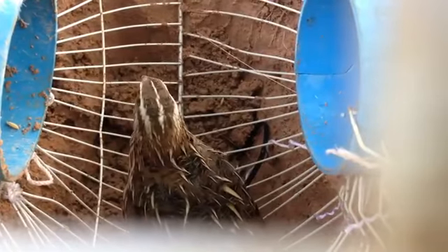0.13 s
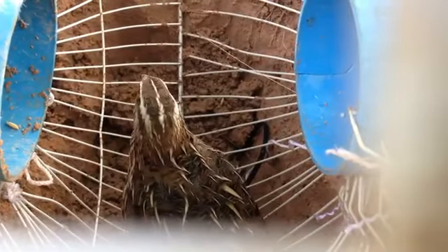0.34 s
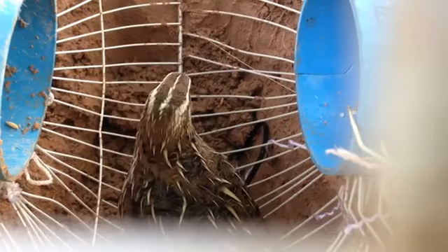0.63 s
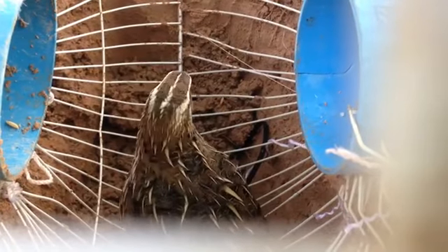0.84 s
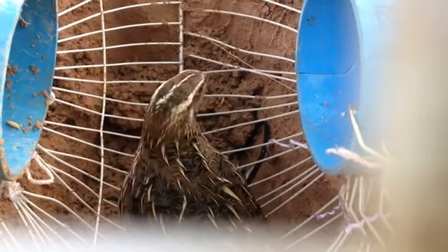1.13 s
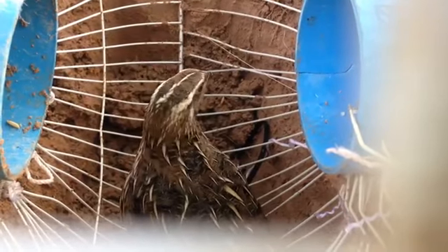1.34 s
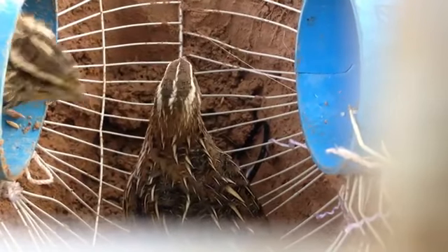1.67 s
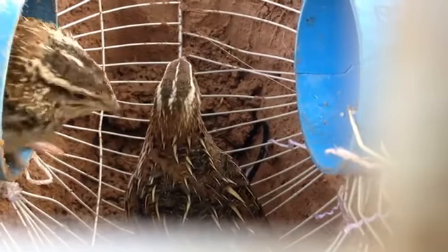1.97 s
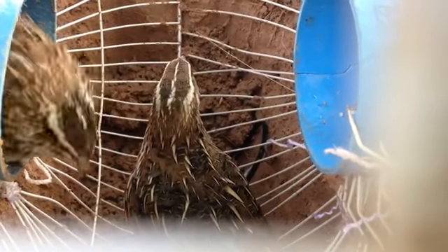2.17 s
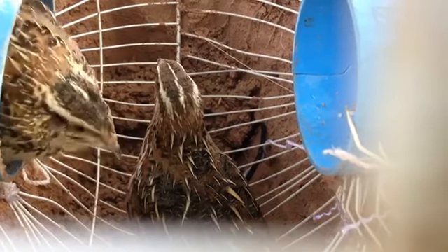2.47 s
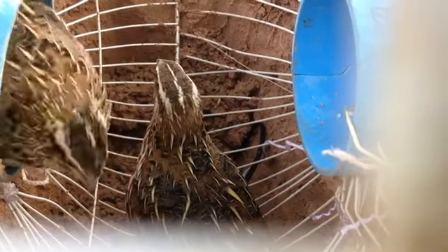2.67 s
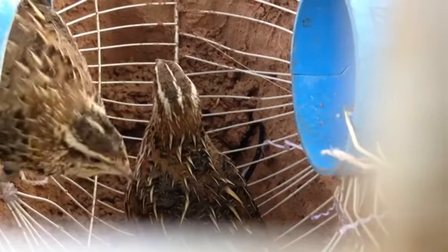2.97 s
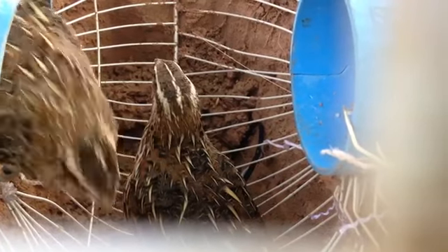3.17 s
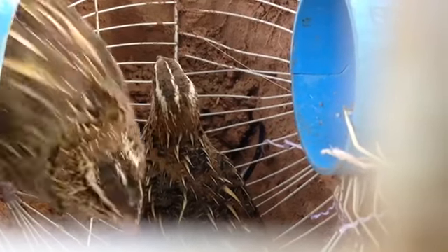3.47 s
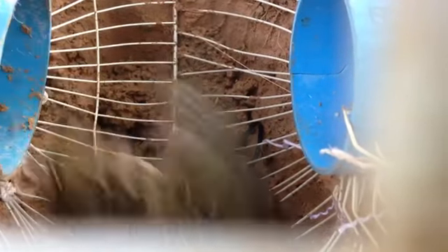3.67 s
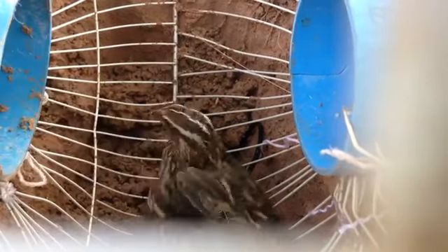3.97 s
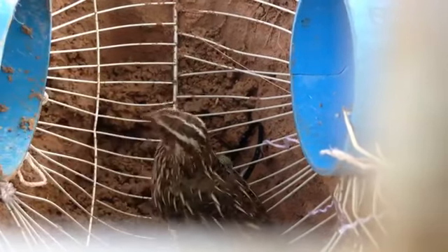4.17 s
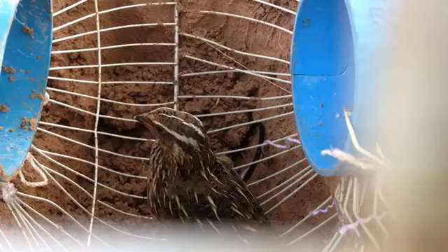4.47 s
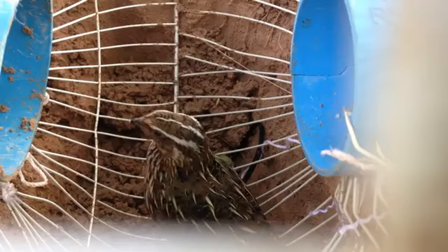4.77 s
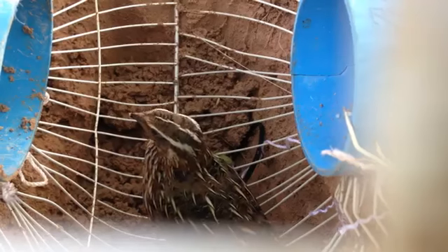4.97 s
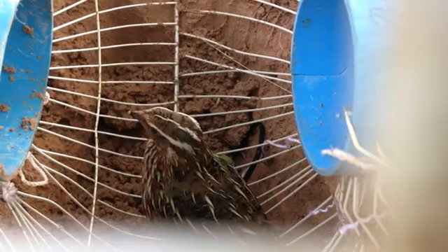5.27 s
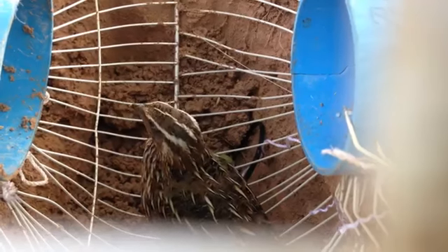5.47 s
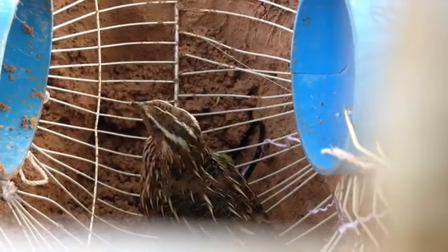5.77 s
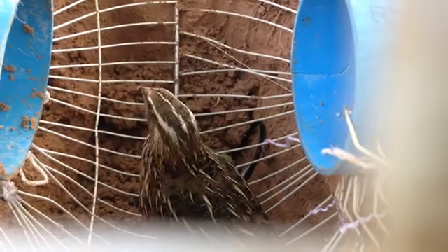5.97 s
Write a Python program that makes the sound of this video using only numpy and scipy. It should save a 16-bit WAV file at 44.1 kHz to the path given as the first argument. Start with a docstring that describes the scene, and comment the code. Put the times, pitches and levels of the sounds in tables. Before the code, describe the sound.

One quail gives four pairs of throbbing, rising two-note chirps amid wire ticks, then a sudden fluttering scramble rattles the cage and quiet ticking follows.

```python
"""A small wire cage on hollow ground outdoors, with quail in it.
One bird gives four pairs of throbbing two-note chirps: a whistle that leaps in pitch and dips in level.
Others add gliding peeps, a coo and faint hoots, all whistles that follow pitch tables.
Feet and beaks tick and ring the wire as fading tones, and a bird flutters off in bursts of noise and knocks.
The ground booms softly in fading low tones, over shaped noise: rumble, hiss, far chatter and a sizzle."""
import sys
import numpy as np
from scipy import signal
from scipy.fft import rfft, irfft, next_fast_len
from scipy.io import wavfile
from scipy.ndimage import uniform_filter1d, map_coordinates

SR = 44100
rng = np.random.default_rng(int(sys.argv[2]) if len(sys.argv) > 2 else 0)


def log_audio(samples):
    """Write samples as a 16-bit WAV file to the path given in sys.argv[1]."""
    # one column per channel
    frames = np.atleast_2d(samples).T
    # limit to full scale, then quantise
    limited = np.clip(frames, -1, 1)
    pcm = np.round(limited * 32767).astype(np.int16)
    wavfile.write(sys.argv[1], SR, pcm)


N = 269451

# Outdoor rumble, its tone colour: (frequency [Hz], relative level per Hz [dB])
RUMBLE_COLOUR = [(12, -51), (20, -27), (59, 0.5), (140, 0.5), (273, -10), (325, -17), (426, -19.5),
                 (507, -22), (567, -28), (644, -21.5), (900, -36.5), (1170, -48.5), (1980, -120)]
# Loudness of the rumble: (time [s], level [dB])
RUMBLE_LEVEL = [(0, -58), (.3, -58), (1.1, -58), (1.5, -60), (1.9, -58.5), (2.6, -57), (3.3, -58),
                (3.85, -54.5), (4.0, -57.5), (4.3, -57.5), (5.0, -57.5), (5.8, -57), (6.11, -55.5)]
# Microphone hiss, its tone colour: (frequency [Hz], relative level per Hz [dB])
HISS_COLOUR = [(290, -23.5), (500, -4), (561, -4.5), (648, -8), (1530, -10), (1670, -10), (3480, -8.5),
               (4440, -8), (14000, -11.5), (15500, -14)]
# Loudness of the hiss: (time [s], level [dB])
HISS_LEVEL = [(0, -64), (1.5, -65), (2.6, -63.5), (3.3, -64.5), (4.0, -63), (4.9, -64.5), (5.36, -62.5),
              (5.7, -64), (6.11, -63)]
# Far bird chatter, its tone colour: (frequency [Hz], relative level [dB])
CHATTER_COLOUR = [(900, -32.5), (1300, -5.5), (1700, 0.5), (2300, -7), (3400, -4.5), (4200, -5),
                  (6000, -43)]
# Swells of the far chatter: (loudest time [s], rise [ms], fall [ms], level [dB])
CHATTER_SWELLS = [(.2, 130, 180, -74), (2.55, 1100, 340, -78), (4.5, 520, 250, -74), (5.38, 180, 210, -69),
                  (6.1, 190, 100, -73)]
# A high hiss that swells twice: (loudest time [s], rise [ms], fall [ms], level [dB])
SIZZLE_SWELLS = [(5.39, 25, 94, -65), (6.02, 110, 59, -61)]
# Tone colour of that high hiss: (frequency [Hz], relative level per Hz [dB])
SIZZLE_COLOUR = [(5000, -13), (8200, -5.5), (9400, -11), (11500, -1.5), (13000, -12), (15500, -11)]
# Soft booms of the ground: (time [s], level [dB], pitch [Hz])
BOOMS = [(.333, -46, 111), (1.943, -42.5, 131), (2.021, -43, 118), (2.736, -39, 129), (2.815, -41, 128),
         (2.998, -46.5, 114.5), (3.482, -38, 132), (3.519, -42, 98), (3.787, -42, 176), (4.016, -40, 133),
         (4.078, -43, 127), (4.15, -43, 120), (6.037, -40, 118.5), (6.078, -47, 176.4)]
# Feathers brushing the wire: (loudest time [s], rise [ms], fall [ms], tips level [dB], wing level [dB])
RUSTLES = [(1.952, 15, 13, -57.5, -70), (2.172, 65, 8.7, -59.5, -72), (3.577, 15, 25, -62, -62),
           (3.818, 29, 9.1, -61, -57.5), (3.879, 33, 14.7, -50, -50.5), (3.93, 4.2, 10, -55, -55),
           (4.02, 36, 14.4, -57.5, -54.5), (5.026, 7.4, 41, -64, -61), (5.178, 14, 10, -60, -61),
           (5.85, 8, 14, -66, -67)]
# Feather tips, also the colour of the patter: (frequency [Hz], relative level per Hz [dB])
TIPS_COLOUR = [(1470, -20), (2500, -6.5), (6980, -9), (7810, -10), (13700, -12.5), (15000, -11.5)]
# Wing strokes: (frequency [Hz], relative level per Hz [dB])
WINGS_COLOUR = [(150, -33), (250, 4), (551, -6), (785, -10.5), (997, -7.5), (1480, -4), (3000, -19),
                (3900, -37), (6600, -120)]
# Contacts with the cage: (time [s], tick level [dB], touched wire level [dB], touched wire pitch [Hz],
# knock level [dB], thud level [dB])
CONTACTS = [(.071, -49, -50, 2020, -64, -70), (0.0901, -50, -48, 2060, -56, -54),
            (0.186, -43, -50, 1700, -79, -69), (0.227, -50, -65, 2360, -80, -73),
            (0.3324, -43.5, -58, 2280, -61, -62), (0.3376, -48, -43.5, 2070, -58, -52),
            (0.6972, -46, -30.5, 2140, -56, -45.5), (0.7062, -50, -51, 1720, -60, -52),
            (0.7576, -47, -56, 2180, -73, -60), (0.9371, -45.5, -32.5, 2180, -51, -49),
            (1.1784, -51, -51.5, 2020, -64, -62), (1.283, -48, -39, 1980, -60, -51.5),
            (1.292, -40.5, -57, 1950, -57, -69), (1.297, -45, -49, 1470, -67, -65),
            (1.73, -49, -50.5, 2050, -72, -58), (2.1681, -47.5, -48, 2500, -66, -68),
            (2.532, -53, -67, 1700, -63, -59), (2.628, -42.5, -42.5, 1550, -54.5, -57),
            (2.6877, -47.5, -43.5, 2580, -69, -66), (2.845, -49.5, -49.5, 1980, -61, -50.5),
            (2.9069, -57, -50, 1590, -62, -56), (3.5748, -49, -58, 1590, -57, -56),
            (3.7918, -51, -43.5, 2020, -58, -44), (3.8327, -42.5, -20, 1540, -26.5, -28.5),
            (3.8354, -54, -28.5, 1960, -25.5, -58), (3.8522, -52, -50, 1990, -39.5, -56),
            (3.8573, -59, -41, 1690, -47, -53), (3.8774, -53, -44, 1420, -46, -36),
            (3.9098, -48, -50, 1400, -67, -53), (3.9287, -42.5, -31.5, 1910, -39.5, -28.5),
            (3.9461, -49, -46, 1470, -51, -62), (4.0004, -57, -54, 1510, -46.5, -64),
            (4.044, -51.5, -50, 1440, -53.5, -71), (4.32, -54.5, -52, 1500, -62, -63),
            (4.462, -53, -70, 1630, -74, -66), (5.0261, -46.5, -40.5, 1700, -54.5, -49.5),
            (5.093, -49, -61, 2280, -71, -63), (5.1749, -45.5, -45.5, 2100, -63, -64),
            (5.1864, -54, -47, 1590, -59, -71)]
# Ringing tones of the neighbouring wires: (pitch [Hz], typical level [dB], time to fall 60 dB [s])
WIRE_TONES = [(1422, -6, 0.019), (1747, 0.5, 0.029), (1840, -11, 0.042), (2770, -7, 0.033),
              (3070, -10, 0.013)]
# Ringing tones of the cage frame: (pitch [Hz], typical level [dB], time to fall 60 dB [s])
FRAME_TONES = [(544, -1, 0.039), (654, 2.5, 0.024), (750, -6.5, .03), (1142, 0.5, 0.018)]
# Ringing tones of the cage floor: (pitch [Hz], typical level [dB], time to fall 60 dB [s])
FLOOR_TONES = [(220, -11, 0.032), (296, 1.5, 0.039), (392, -1.5, 0.021)]
# Main noise of a tick: (frequency [Hz], relative level [dB])
TICK_COLOUR = [(1500, -37), (3000, -1.5), (5000, -1), (6500, -8.5), (8000, -20.5)]
# Bright edge of a tick: (frequency [Hz], relative level [dB])
BRIGHT_COLOUR = [(5000, -36), (7000, -3.5), (12000, -6), (16000, -13)]
# The contacts carry no deep bass: (frequency [Hz], gain [dB])
CONTACT_BASS_CUT = [(50, -30), (170, 0), (16000, 0)]
# Thin peeps, one list each: (time [s], pitch [Hz], level [dB])
PEEPS = [
    [(0.122, 3570, -68), (0.14, 4570, -68), (0.167, 5290, -58), (0.175, 3340, -59), (0.181, 2140, -58),
     (0.19, 1666, -66), (0.212, 1730, -65)],
    [(1.414, 1515, -72), (1.425, 980, -69), (1.445, 1540, -76), (1.47, 1700, -74)],
    [(1.94, 1560, -67), (1.955, 1450, -63.5), (1.97, 1477, -66), (1.98, 2110, -64)],
    [(4.589, 1337, -60), (4.605, 1865, -47), (4.622, 1384, -53), (4.627, 2570, -46.5), (4.633, 4250, -58),
     (4.64, 2680, -54)],
    [(5.45, 1455, -61), (5.46, 1604, -55), (5.472, 1437, -53), (5.478, 1690, -50), (5.483, 2939, -75)],
    [(5.535, 3800, -68), (5.565, 3270, -56), (5.58, 2960, -60), (5.598, 2850, -61)],
]
# The coo: (time [s], base pitch [Hz], level [dB])
COO = [(2.535, 213, -73), (2.555, 218.4, -63), (2.59, 239.7, -59.5), (2.62, 235.7, -59.5),
       (2.648, 255, -60.5), (2.67, 220, -61)]
# Tones heard in the coo: (multiple of the base pitch [times], relative level [dB])
COO_TONES = [(3, -4.5), (4, 3.5), (7, -11), (8, -13)]
# Faint low hoots: (loudest time [s], pitch before a 1 % lowering [Hz], level [dB], half length [ms])
HOOTS = [(.18, 330, -58, 22), (.41, 332, -59, 15)]
# Arched peeps: (start [s], top [s], tail reached [s], end [s], top pitch [Hz], tail pitch [Hz], level [dB],
# fade of the tail [dB], lift near the tube's resonance [dB], overtone level [dB])
ARCHES = [(1.309, 1.347, 1.387, 1.416, 3140, 1830, -46.5, -7, 12, -18),
          (2.676, 2.714, 2.749, 2.787, 3470, 1860, -49, -3, 1, -32),
          (5.99, 6.034, 6.071, 6.1, 3330, 1900, -49.5, -6, 11, -32)]
# Shape of every arch: (stage: 0 start, 1 top, 2 tail, 3 end [number],
# way from tail pitch to top pitch [share], relative level [dB])
ARCH_SHAPE = [(0, .05, -16), (.3, .45, -2), (.63, .8, -3), (1, 1, -1.5), (1.35, .85, -2.5), (1.7, .35, 0),
              (2, .04, -.5), (2.5, 0, 0), (3, .05, -4)]
# Chirps, first and second of each pair in turn; the voice catches, then leaps from the low to the high note:
# (start [s], catch [s], low note [Hz], high note [Hz])
CHIRPS = [(0.256, .279, 2330, 2582), (.388, 0.409, 2445, 2672), (0.86, .878, 2320, 2618),
          (.986, 1.0057, 2468, 2733), (1.495, 1.515, 2370, 2630), (1.620, 1.649, 2486, 2778),
          (2.119, 2.142, 2405, 2635), (2.244, 2.272, 2487, 2777)]
# Pitch of the low note, in a first and in a second chirp: (time after the start [ms], above the low note [Hz])
LOW_NOTE = [
    [(-6, -39.5), (1.5, 40), (9, 0), (15, 10)],
    [(-5.5, 190), (-1, 158), (1.5, 49.5), (10, -10), (16.5, 20)],
]
# Pitch of the high note, in a first and in a second chirp: (time after the catch [ms], above the high note [Hz])
HIGH_NOTE = [
    [(3, -140), (11, -30.5), (22, 19), (32, 2), (40, -51.5)],
    [(3, -50.5), (10, -30.5), (18, -0.5), (26, 16), (38, -8.5), (48, -120)],
]
# Loudness of each chirp, one list each: (time [s], level [dB])
LOUDNESS = [
    [(.248, -64), (.259, -41.5), (.272, -37), (.284, -35), (.300, -35), (.315, -28), (.3195, -46),
     (.325, -56)],
    [(.376, -65), (.385, -46), (.390, -30), (.402, -27), (.411, -35), (.418, -32), (.423, -43),
     (.434, -26.5), (.445, -42), (.451, -36), (.457, -67)],
    [(.858, -60), (.864, -42), (.871, -40), (.877, -33.5), (.890, -32), (.902, -37), (.915, -27),
     (.9205, -50), (.927, -56)],
    [(.976, -52), (.983, -38), (.990, -27), (1.002, -30), (1.014, -26.5), (1.025, -25), (1.034, -27.5),
     (1.045, -26.5), (1.053, -41), (1.06, -55)],
    [(1.484, -60), (1.498, -41), (1.510, -38.5), (1.520, -40.5), (1.529, -24.5), (1.540, -27.5),
     (1.544, -28), (1.548, -22), (1.556, -29.5), (1.562, -55)],
    [(1.617, -70), (1.630, -27), (1.644, -26), (1.656, -23.5), (1.660, -24), (1.665, -21.5), (1.673, -34),
     (1.682, -22), (1.693, -27.5), (1.699, -53)],
    [(2.106, -69), (2.114, -48.5), (2.128, -48), (2.134, -36), (2.150, -31.5), (2.157, -32.5), (2.165, -60),
     (2.169, -35), (2.181, -25.5), (2.186, -52)],
    [(2.239, -63), (2.246, -32), (2.254, -19), (2.260, -22.5), (2.268, -26), (2.277, -18.5), (2.283, -22),
     (2.287, -20.5), (2.305, -20), (2.317, -33), (2.322, -49)],
]
# Moments where a chirp dips and its wave turns over: (time [s], width to one side [ms])
DIPS = [(.265, 2.2), (.295, 2.4), (.388, 1.2), (.396, 1.7), (0.897, 2.5), (.986, 1.1), (.995, 1.2),
        (1.021, 2.5), (1.522, 1.2), (1.533, 2.6), (1.635, 3.6), (2.120, 1.5), (2.159, 1.9)]
# Soft pips just before or after a chirp: (loudest time [s], pitch [Hz], level [dB])
PIPS = [(.375, 1830, -58), (.854, 2300, -51), (1.089, 1800, -61), (1.486, 2160, -55), (1.616, 1840, -57),
        (2.192, 2420, -48), (2.237, 1860, -54), (2.357, 1880, -58)]

TOP_HZ = 15150  # nothing is kept from here up
BOOM_T60_S = 0.18  # time to fall 60 dB
PATTER_PER_S, PATTER_DB, PATTER_SPREAD_DB = 9, -61, 4.5
TICK_HZ, TICK_SPREAD = 4300, 0.2  # typical tick pitch, random spread of its logarithm
BRIGHT_DB, BRIGHT_SPREAD_DB = -2.5, 3  # typical bright edge within a tick
CONTACT_RISE_S = 0.0006
TUBE_HZ, TUBE_WIDTH_HZ = 2730, 165
TUBE_FALLING = 0.52  # share of the lift in dB that is left after the top of an arch
CATCH_DROP_HZ, CATCH_OVERTONE_DB = 215, 6
DIP_DROP_HZ, DIP_LEAD_S = 70, 0.002  # the pitch sags just before a dip


def amp(db):
    """Turn decibels into gain."""
    return 10 ** (np.asarray(db) / 20)


def unit(x):
    """Scale to an average (rms) level of 1."""
    return x / np.sqrt(np.mean(x ** 2) + 1e-20)


def curve(rows, column=1):
    """Draw one column of a table as a line with a value for every sample."""
    rows = np.asarray(rows)
    return np.interp(np.arange(N) / SR, rows[:, 0], rows[:, column])


def during(rows):
    """Give 1 while a table lasts and 0 elsewhere, with soft ends."""
    t = np.arange(N) / SR
    to_nearest_end = np.minimum(t - rows[0][0], rows[-1][0] - t)
    return np.clip(to_nearest_end / 0.0011, 0, 1)


def wobble(rate):
    """Draw a smooth random curve through a number of random points a second."""
    points = rng.standard_normal(int(N * rate / SR) + 4)
    return map_coordinates(points, [np.arange(N) * rate / SR])


def coloured(x, points):
    """Shape the spectrum of x by (Hz, dB) points joined on a log frequency axis."""
    m = next_fast_len(len(x) + 4096)
    f, db = np.transpose(points)
    hz = np.fft.rfftfreq(m, 1 / SR)
    gain = amp(np.interp(np.log(hz + 1), np.log(f + 1), db))
    return irfft(rfft(x, m) * gain, m)[:len(x)]


def noise(points):
    """Make coloured noise as long as the scene."""
    return coloured(rng.standard_normal(N), points)


def whistle(hz, tones):
    """Sing pure tones at (multiple, dB) of a pitch curve."""
    phase = 2 * np.pi * np.cumsum(hz) / SR
    return sum(amp(db) * np.sin(k * phase) for k, db in tones)


def swell(s, rise_ms, fall_ms):
    """Draw a bell at half height rise_ms before and fall_ms after its top."""
    ms = 1000 * (np.arange(N) / SR - s)
    distance = np.where(ms < 0, ms / rise_ms, ms / fall_ms) ** 2
    return np.exp(-np.log(2) * np.minimum(distance, 60))


def swells(rows):
    """Add up bells from rows of (s, rise ms, fall ms, dB)."""
    return sum(amp(db) * swell(s, rise_ms, fall_ms) for s, rise_ms, fall_ms, db in rows)


def ring(modes, t, chance):
    """Sum fading tones, as a struck body rings, each with its own random strength."""
    out = 0
    for (hz, db, t60), c in zip(modes, chance):
        out = out + amp(db + 2 * c - 60 * t / t60) * np.sin(2 * np.pi * hz * t)
    return out


def glide(rows, tones, rough_db):
    """Sing one smooth call along its table; the throat mutes overtones above about 4 kHz."""
    hz = uniform_filter1d(uniform_filter1d(curve(rows), size=150), size=150)
    voice = 0
    for k, db in tones:
        muting = 1 + (k > 1) * (k * hz / 4200) ** 12
        voice = voice + whistle(hz, [(k, db)]) / muting
    level = amp(curve(rows, column=2) + rough_db * wobble(120))
    return during(rows) * level * voice


def air():
    """Shape noise into lumpy rumble, flickering hiss, far bird chatter and a passing sizzle."""
    rumble = unit(amp(2.2 * wobble(19)) * noise(RUMBLE_COLOUR))
    flicker_db = 0.5 * wobble(14) + 0.7 * wobble(150)
    hiss = unit(amp(flicker_db) * noise(HISS_COLOUR))
    chatter = unit(amp(3.5 * wobble(40)) * noise(CHATTER_COLOUR))
    chatter_level = amp(-82.5) + swells(CHATTER_SWELLS)  # a steady murmur plus swells
    sizzle = swells(SIZZLE_SWELLS) * unit(noise(SIZZLE_COLOUR))
    steady = amp(curve(RUMBLE_LEVEL)) * rumble + amp(curve(HISS_LEVEL)) * hiss
    return steady + chatter_level * chatter + sizzle


def booms():
    """Soft footfalls ring the hollow under the cage, each as one fading low tone."""
    out, t = np.zeros(N + SR), np.arange(SR // 2) / SR
    rise = 1 - np.exp(-t / 0.0029)
    for s, db, hz in BOOMS:
        boom = amp(db - 60 * t / BOOM_T60_S) * rise * np.sin(2 * np.pi * hz * t)
        out[round(s * SR):][:len(t)] += boom
    return out[:N]


def rustle():
    """Feathers make grainy noise that swells: fine tips above, wing strokes below."""
    grain = amp(2.5 * wobble(260))
    tips = unit(grain * noise(TIPS_COLOUR))
    wings = unit(grain * noise(WINGS_COLOUR))
    out = np.zeros(N)
    for s, rise_ms, fall_ms, tips_db, wings_db in RUSTLES:
        out += swell(s, rise_ms, fall_ms) * (amp(tips_db) * tips + amp(wings_db) * wings)
    return out


def patter():
    """Grit and claws give faint bright ticks at random: tiny fading bursts of noise."""
    t = np.arange(SR // 100) / SR
    starts = rng.random(N) < PATTER_PER_S / SR
    sizes = starts * amp(PATTER_SPREAD_DB * rng.standard_normal(N))
    fading = signal.fftconvolve(sizes, amp(-60 * t / 0.0091))[:N]
    return amp(PATTER_DB) * fading * unit(noise(TIPS_COLOUR))


def contacts():
    """Each contact ticks, pings the touched wire and its neighbours, knocks the frame and thuds on the floor."""
    out, t = np.zeros(N + SR), np.arange(SR // 10) / SR
    chances = rng.standard_normal((len(CONTACTS), 4, len(WIRE_TONES)))
    noises = rng.standard_normal((len(CONTACTS), len(t)))
    fade = amp(-60 * t / 0.015)
    rise = 1 - np.exp(-t / CONTACT_RISE_S)
    for row, c, n in zip(CONTACTS, chances, noises):
        s, tick_db, wire_db, wire_hz, knock_db, thud_db = row
        tick_hz = TICK_HZ * np.exp(TICK_SPREAD * c[3, 0])
        bright_db = BRIGHT_DB + BRIGHT_SPREAD_DB * c[3, 1]
        snap = 0.82 * unit(coloured(n, TICK_COLOUR))
        snap += 0.47 * np.sin(2 * np.pi * tick_hz * t)
        snap += amp(bright_db - 60 * t / 0.01) * unit(coloured(n, BRIGHT_COLOUR))
        tick = amp(tick_db) * fade * snap
        touched = fade * np.sin(2 * np.pi * wire_hz * t)
        wire = amp(wire_db) * (touched + 0.36 * ring(WIRE_TONES, t, c[0]))
        knock = amp(knock_db) * ring(FRAME_TONES, t, c[1])
        thud = amp(thud_db) * ring(FLOOR_TONES, t, c[2])
        out[round(s * SR):][:len(t)] += (tick + wire + knock + thud) * rise
    return coloured(out[:N], CONTACT_BASS_CUT)


def arches():
    """Peeps rise to a top and fall to a fading tail, louder where the pitch crosses the tube's resonance."""
    out = np.zeros(N)
    for *stages, top_hz, tail_hz, db, fade_db, lift_db, overtone_db in ARCHES:
        rows = []
        for stage, height, shape_db in ARCH_SHAPE:
            time = np.interp(stage, range(4), stages)
            hz = tail_hz + height * (top_hz - tail_hz)
            rows.append((time, hz, db + shape_db + fade_db * max(stage - 2, 0)))
        distance = (uniform_filter1d(curve(rows), size=200) - TUBE_HZ) / TUBE_WIDTH_HZ
        lift = lift_db * np.where(np.arange(N) / SR < stages[1], 1, TUBE_FALLING)
        voice = glide(rows, [(1, 0), (2, overtone_db)], rough_db=1.5)
        out += amp(lift / (1 + distance ** 2)) * voice
    return out


def other_birds():
    """Other birds whistle along pitch tables: arched and thin peeps, a coo and faint hoots."""
    thin = sum(glide(rows, [(1, 1), (2, -13)], rough_db=2) for rows in PEEPS)
    coo = glide(COO, COO_TONES, rough_db=0.5)
    hoots = np.zeros(N)
    for s, hz, db, half_ms in HOOTS:
        hoots += amp(db) * swell(s, half_ms, half_ms) * whistle(np.full(N, hz), [(0.99, 0)])
    return arches() + thin + coo + hoots


def chirp_pitch():
    """The voice holds a low note, drops at the catch and leaps to an arched high note."""
    knots = []
    for k, (start, catch, low_hz, high_hz) in enumerate(CHIRPS):
        low = [(start + ms / 1000, low_hz + hz) for ms, hz in LOW_NOTE[k % 2]]
        low = [(s, hz) for s, hz in low if s < catch - 0.004]
        drop = [(catch - 0.003, low[-1][1]), (catch, low_hz - CATCH_DROP_HZ)]
        high = [(catch + ms / 1000, high_hz + hz) for ms, hz in HIGH_NOTE[k % 2]]
        knots += low + drop + high
    return uniform_filter1d(curve(sorted(knots)), size=60)


def chirp_level():
    """Each chirp follows its loudness table in rounded lobes."""
    lobes = np.zeros(N)
    for rows in LOUDNESS:
        roots = [(s, amp(db / 2)) for s, db in rows]  # squared again below, which rounds the lobes
        lobes += during(rows) * curve(roots) ** 2
    return uniform_filter1d(uniform_filter1d(lobes, size=90), size=90)


def chirps():
    """A whistle throbs as its wave turns over at every dip; the overtone throbs much less."""
    level = chirp_level()
    sag = sum(swell(s - DIP_LEAD_S, 1.5, 1) for s, _ in DIPS)
    hz = chirp_pitch() + 22 * wobble(190) - DIP_DROP_HZ * sag
    # one more dip, 1 ms wide, on either side of every catch
    catch_dips = [(row[1] + ms / 1000, 1) for row in CHIRPS for ms in (-0.96, 2.67)]
    turn = np.ones(N)
    for s, width_ms in DIPS + catch_dips:
        turn *= np.tanh(1000 * (np.arange(N) / SR - s) / width_ms)
    voice = level * turn * amp(0.71 * wobble(200)) * whistle(hz, [(1, 0)])
    voice[170:] += 0.04 * voice[:-170]  # a near wall answers, so both notes beat across a catch

    effort = np.abs(uniform_filter1d(level, size=300)) ** 0.67
    catch_db = sum(CATCH_OVERTONE_DB * swell(row[1], 2.7, 1.2) for row in CHIRPS)
    voice += amp(-44 + catch_db + 3 * wobble(130)) * effort * whistle(hz, [(2, 0)])
    for s, pip_hz, db in PIPS:
        voice += amp(db) * swell(s, 1.1, 1.9) * whistle(np.full(N, pip_hz), [(1, 0)])
    return voice


def echoes(x):
    """Ground and tubes around the cage answer briefly, as a fading random tail."""
    t = np.arange(SR // 5) / SR
    tail = rng.standard_normal(len(t)) * amp(-60 * t / 0.065) * (t > 0.003)
    return signal.fftconvolve(x, tail / np.linalg.norm(tail))[:N]


def scene():
    """Mix all sources into one channel; only the near ones get echoes."""
    background = air() + booms() + rustle()
    near = patter() + contacts() + other_birds() + chirps()
    return (background + near + amp(-18) * echoes(near))[None]


def record(dry):
    """The microphone sheds the deepest bass, below about 25 Hz, and keeps nothing above its band limit."""
    m = next_fast_len(N + 4096)
    hz = np.fft.rfftfreq(m, 1 / SR)
    bass = 1j * hz / 25 / (1 + 1j * hz / 25)
    return irfft(rfft(dry, m) * bass * (hz < TOP_HZ), m)[:, :N]


dry = scene()
out = record(dry)
log_audio(out)
```